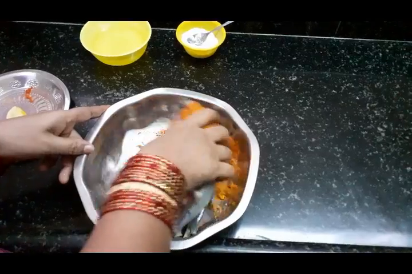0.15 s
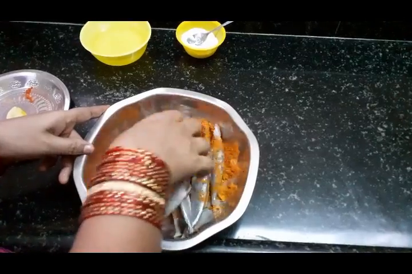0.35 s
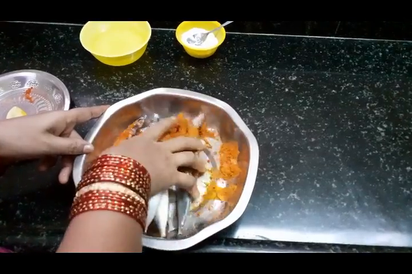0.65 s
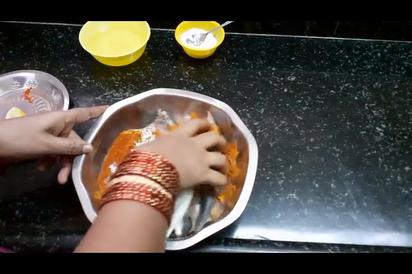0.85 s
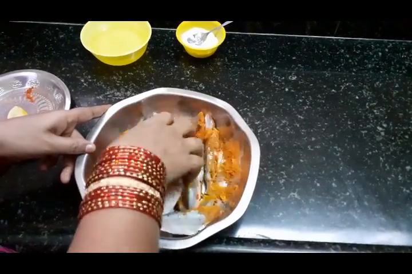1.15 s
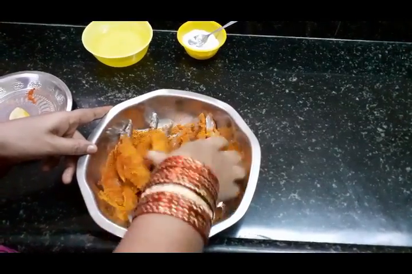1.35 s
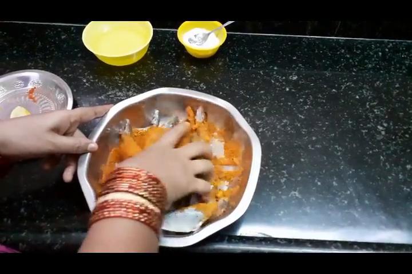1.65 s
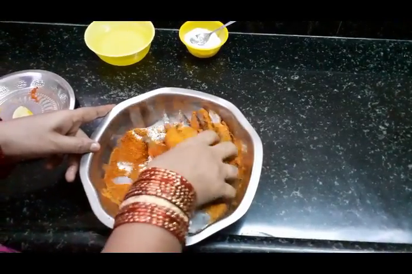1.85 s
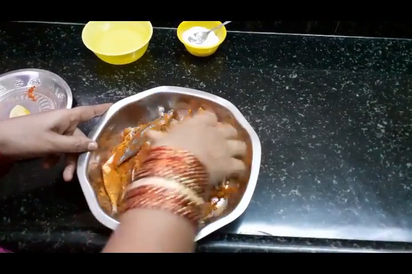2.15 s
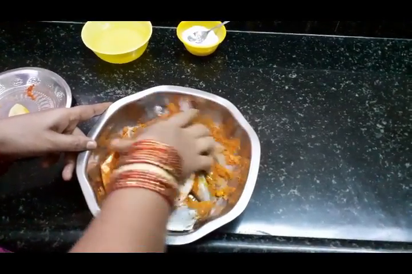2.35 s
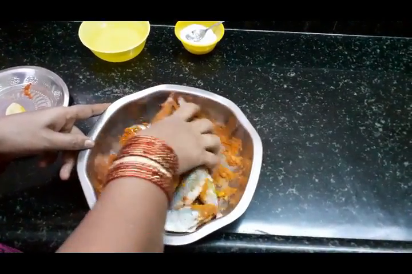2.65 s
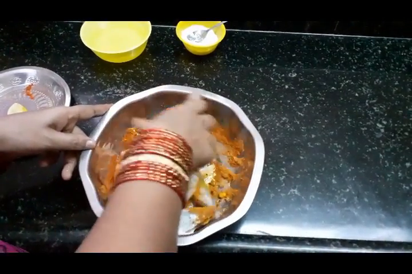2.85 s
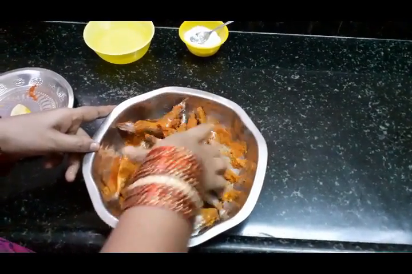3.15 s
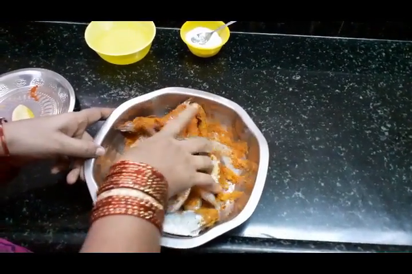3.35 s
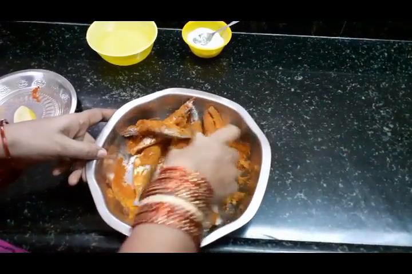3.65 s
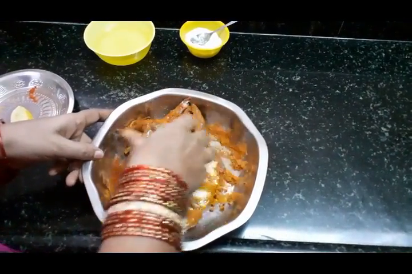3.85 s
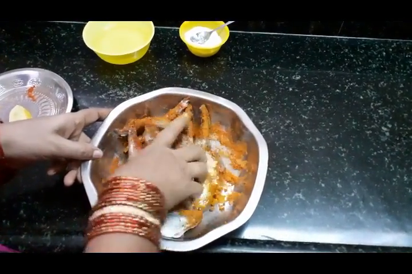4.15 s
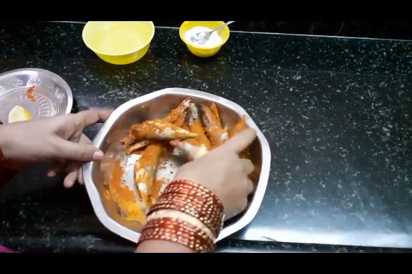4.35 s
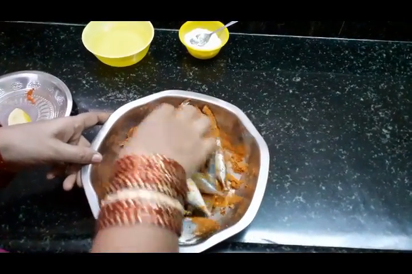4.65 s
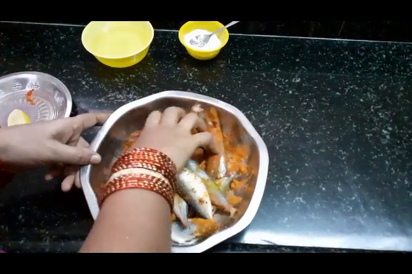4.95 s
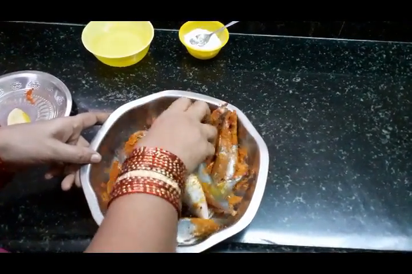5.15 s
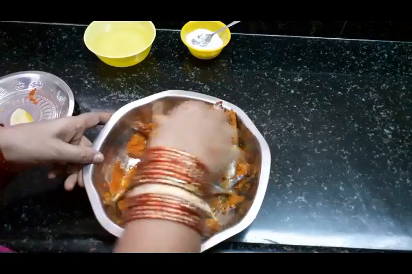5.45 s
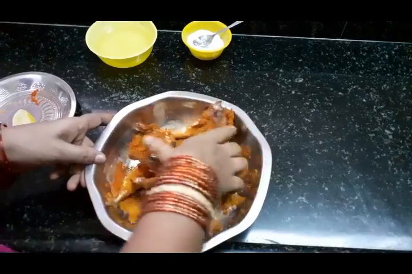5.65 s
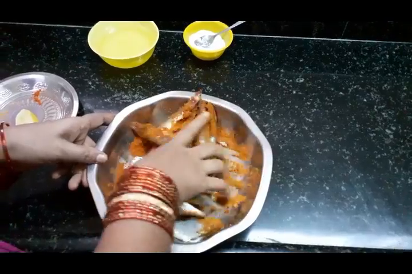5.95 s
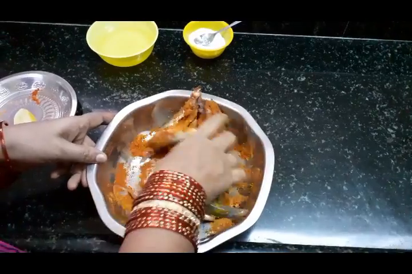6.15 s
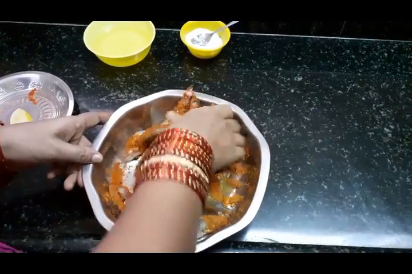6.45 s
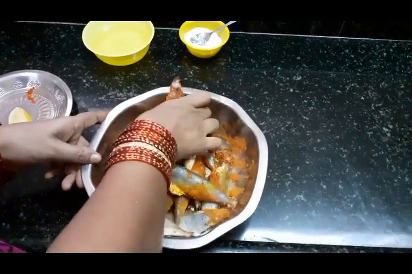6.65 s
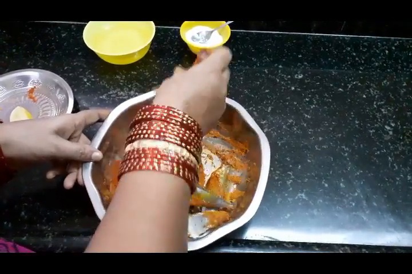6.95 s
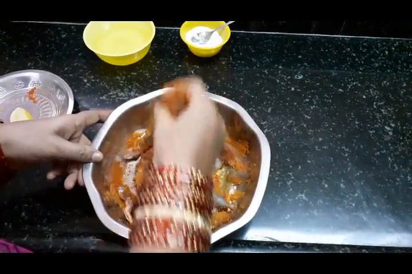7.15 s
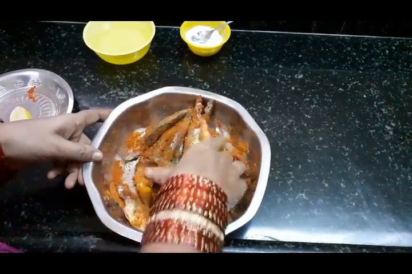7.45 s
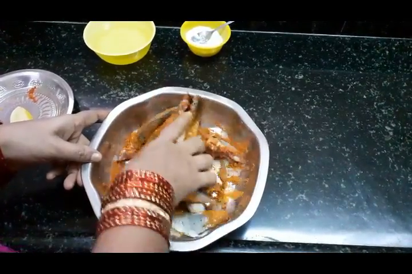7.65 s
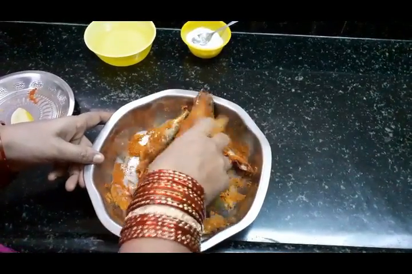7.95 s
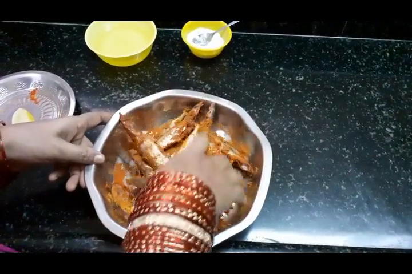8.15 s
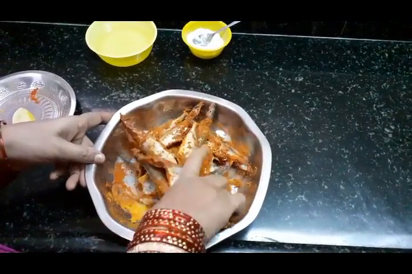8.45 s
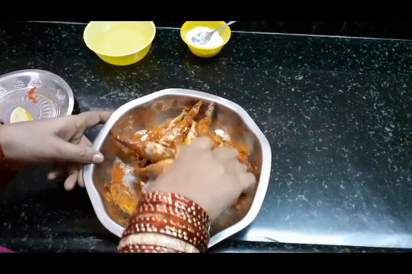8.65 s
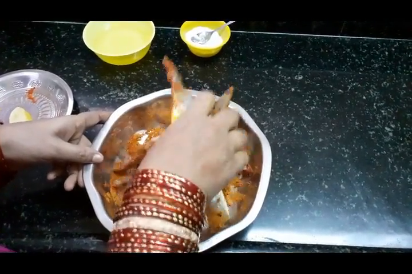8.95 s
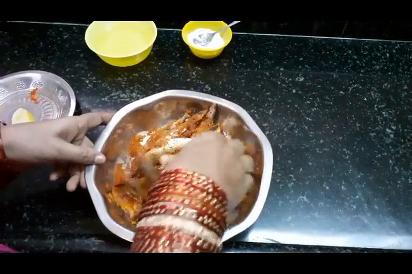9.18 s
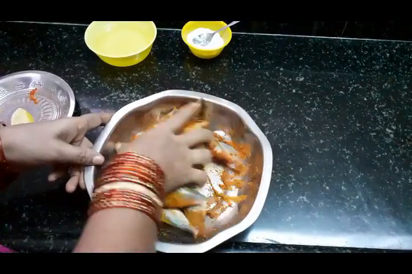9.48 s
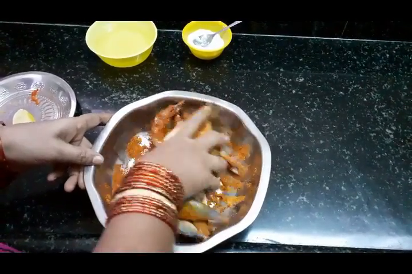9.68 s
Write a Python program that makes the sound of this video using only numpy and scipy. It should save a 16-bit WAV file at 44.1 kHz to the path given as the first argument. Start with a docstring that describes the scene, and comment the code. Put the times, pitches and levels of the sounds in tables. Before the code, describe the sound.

Small slick fish are kneaded by hand in a metal bowl on a stone counter, heard near the microphones in stereo with a short kitchen reverberation. Irregular moist rustles and sticky crackles start strongly, then soften into spaced squeezes. Dull steel knocks, bangle-like ticks and soft thuds scatter through, with one grinding, booming bowl slide midway and a sloppy slap and firm strokes near the end.

```python
"""Small wet fish with spice paste are tossed by hand in a steel bowl: skins rub, crackle and pop.
Uneven crackling noise makes the rubbing; short ringing tones and noise make the bowl's taps and knocks.
Soft thuds, bright ticks, wet noise bursts and one scuff of the bowl on a stone counter join in.
The bowl's modes hum softly over a faint drone. Hard kitchen walls answer all but thuds, hum and drone."""
import sys
import numpy as np
from scipy import signal
from scipy.fft import rfft, irfft, next_fast_len
from scipy.io import wavfile

SR = 44100
rng = np.random.default_rng(int(sys.argv[2]) if len(sys.argv) > 2 else 0)


def output_pcm(signal):
    """Save a mono or channel-first signal as 16-bit PCM at the path in sys.argv[1].

    Samples are clipped to [-1, 1] before scaling.
    """
    pcm = np.clip(np.atleast_2d(signal).T, -1, 1) * 32767
    wavfile.write(sys.argv[1], SR, np.round(pcm).astype(np.int16))


N = 432943

# The hand sweeps the fish round the bowl; each sweep swells, then stops.
# Each row: moment of the peak in seconds, level in dB, swell rate in dB per second.
SWEEPS = [(0.0, -45, 100), (0.598, -48, 52), (0.85, -40.5, 79), (1.756, -43.5, 68), (2.382, -38.5, 120),
          (2.6, -45, 65), (6.008, -40, 105), (7.659, -45.5, 61), (9.679, -44, 96)]
# The fingers close on the fish, knead and let go.
# Each row: start in seconds, level in dB, hold time in seconds.
SQUEEZES = [(0.07, -55.5, 0.17), (0.209, -44, 0.16), (0.833, -38.5, 0.024), (1.311, -50.5, 0.16),
            (1.923, -48, 0.26), (2.636, -51, 0.15), (3.151, -50, 0.35), (3.56, -52.5, 0.27),
            (4.084, -49, 0.26), (4.405, -52, 0.13), (4.784, -47.5, 0.27), (5.292, -48, 0.032),
            (5.492, -47, 0.26), (6.154, -49, 0.066), (6.359, -51.5, 0.46), (6.97, -51, 0.085),
            (7.843, -48.5, 0.22), (8.202, -46, 0.22), (8.752, -52.5, 0.3), (9.2, -49.5, 0.29)]
# Tone colour of the rubbing skins. Each row: frequency in Hz, level in dB per Hz.
SKIN_COLOUR = [(150, -33), (500, -28), (1060, -7.5), (1400, 2.5), (1900, -2.5), (4000, 2.5), (7000, -11)]
# Tone colour of the crackling paste. Each row: frequency in Hz, level in dB per Hz.
PASTE_COLOUR = [(4500, -20.5), (6300, 0), (7200, -6), (9000, 5), (10300, -12), (16000, -5.5)]
# Ringing modes of the steel bowl. Each row: frequency in Hz, level in dB with the hand in it,
# level in dB with the hand lifted, time in seconds to fall 60 dB when free.
BOWL_MODES = [(321.8, -7, -1.5, 0.4), (368.4, -6, -15, 0.49), (505, -9.5, -25, 0.24), (681, -6, -21, 0.15),
              (948, -9.5, -3, 0.3), (1083, -13, -7, 0.31), (1344, 1, -3, 0.097), (1419, 0, -2.5, 0.043),
              (1780, -3.5, -9, 0.052), (2025, -26, -2, 0.38), (2730, -16.5, -5.5, 0.18),
              (3918, -8.5, -16, 0.047)]
# The hand is out of the bowl. The row: from and to, both in seconds.
HAND_LIFTED = (6.9, 7.4)
# Tone colour of the faint drone. Each row: frequency in Hz, level in dB per Hz.
DRONE_COLOUR = [(30, -52), (105, -5.5), (140, -21.5), (350, -19.5), (600, -23), (3900, -23), (16000, -28.5)]
# Light taps that ring a few neighbouring modes. Each row: start in seconds, level in dB, centre in Hz.
TAPS = [(0.22, -48, 1440), (2.929, -63, 424), (3.029, -71.5, 347), (3.58, -64, 3000), (3.908, -65, 1320),
        (4.29, -63, 386), (4.54, -64, 696), (4.551, -72, 1280), (4.761, -69.5, 1340), (5.257, -64.5, 1260),
        (5.314, -62, 1300), (5.328, -57.5, 394), (5.744, -56, 740), (6.382, -63.5, 710),
        (6.459, -65.5, 630), (6.617, -67, 576), (8.022, -58.5, 680), (8.829, -60.5, 3960)]
# Tone colour of a contact's crack. Each row: frequency in Hz, level in dB per Hz.
CRACK_COLOUR = [(60, -16), (200, -11.5), (600, 1), (1350, -1), (2300, -9), (4000, -10), (6500, -16.5),
                (9000, -9.5), (10500, -18), (16000, -25)]
# The bowl knocks on the stone. Each row: start in seconds, level in dB before the tone is shaped,
# weight below 750 Hz in dB, edge above 2.2 kHz in dB, treble cut-off in Hz.
KNOCKS = [(0.234, -53, -14, -1.5, 14000), (0.303, -58.5, 4, -1, 14000), (1.046, -43.5, -0.5, 6.5, 3900),
          (1.111, -46, -8.5, -6.5, 15000), (1.951, -44.5, -5, -8.5, 7660), (2.01, -54.5, -1, -4.5, 9450),
          (2.071, -38, -9, -8, 15000), (2.615, -52.5, -0.5, -5.5, 4870), (2.767, -49.5, -9.5, -10.5, 3280),
          (3.699, -71.5, 3.5, 11, 5070), (4.403, -58.5, 2, -1, 5000), (4.803, -43, 7, 3, 4700),
          (4.941, -52.5, 4.5, -1, 2500), (6.009, -67.5, 12, 4, 5060), (7.138, -39.5, -6.5, 3.5, 2740),
          (7.683, -49, -12, 1, 7600), (7.701, -38.5, 0.5, -0.5, 6900), (8.048, -48, -6, -5.5, 9960),
          (8.201, -57.5, 3, -6, 3930), (8.857, -49.5, 1, -1.5, 6200), (9.067, -60, 2, -2, 3080),
          (9.196, -60, 5.5, 5.5, 9000), (9.661, -47, 4.5, -3, 5000)]
# Soft pushes boom through the counter. Each row: start in seconds, level in dB.
THUDS = [(0.344, -59), (2.079, -61), (3.15, -63), (4.791, -53), (5.333, -59.5), (6.819, -65.5),
         (8.871, -58), (9.077, -63.5), (9.669, -62)]
# Bright ticks from bangles, wet paste and hard contacts. Each row: start in seconds, level in dB.
BRIGHT_TICKS = [(1.111, -59.5), (2.072, -46), (3.038, -61), (3.911, -61), (4.482, -58.5), (4.696, -66),
                (6.253, -57.5), (7.151, -54.5), (7.779, -48.5), (8.413, -57)]
# Tone colour of a tick. Each row: frequency in Hz, level in dB per Hz.
TICK_COLOUR = [(1800, -42), (4200, 4), (6500, -3), (8700, 5.5), (10500, -2.5), (15000, -1.5)]
# Wet noise bursts: a bright rubbing swell, a soft low rub, a sprinkle and one sloppy slap.
# Each row: start in seconds, level in dB, length in seconds, lowest pitch in Hz.
WET_BURSTS = [(2.252, -53, 0.14, 7000), (4.174, -61.5, 0.12, 597), (7.234, -48, 0.053, 7550),
              (7.693, -34.5, 0.079, 201)]
# Tone colour of a wet burst. Each row: frequency in Hz, level in dB per Hz.
BURST_COLOUR = [(200, -4.5), (700, -2.5), (2000, -11.5), (4200, -7.5), (6500, -18), (15000, -20.5)]
# Tone colour of the sliding foot of the bowl. Each row: frequency in Hz, level in dB per Hz.
FOOT_COLOUR = [(80, -28), (170, -10), (250, -18.5), (325, 1.5), (410, -17.5), (540, -15), (800, -32),
               (2500, -53)]
# How long the kitchen rings. Each row: frequency in Hz, time in seconds to fall 60 dB.
ROOM_T60 = [(260, 0.45), (1840, 0.34), (5000, 0.24), (14000, 0.29)]
# Tone balance of the two microphone ports. Each row: frequency in Hz, left minus right in dB.
PORT_BALANCE = [(100, -6), (400, -4), (4400, -3), (8300, -6.5), (11500, -0.5)]

TOP_HZ = 16000  # nothing is kept above this
TIME = np.arange(N) / SR  # seconds through the scene
RING = TIME[:SR // 2]  # seconds through one short sound
SWEEP_STOP_DB_PER_S = 164.5
# a squeeze: attack, slow sag while held, extra fall on release
GRIP_S, RELAX_DB_PER_S, LET_GO_DB_PER_S = 0.0079, 3, 179


def undb(db):
    """Turn decibels into gain."""
    return 10 ** (np.asarray(db) / 20)


def unit(x):
    """Scale to an rms (average strength) of 1."""
    return x / np.sqrt(np.mean(x ** 2))


def blow(x):
    """Scale a short sound to the energy of one second at an rms of 1."""
    return unit(x) * np.sqrt(SR / x.shape[-1])


def freqs(size):
    """Give the frequencies in the spectrum of a sound of this size."""
    return np.maximum(np.fft.rfftfreq(size, 1 / SR), 1)


def lookup(points, hz):
    """Read between (Hz, value) points, spaced by pitch as the ear hears it."""
    f, value = np.transpose(points)
    return np.interp(np.log(hz), np.log(f), value)


def colour(x, points):
    """Filter to the given (Hz, dB) curve, with no sound before its cause (minimum phase)."""
    size = 2 * next_fast_len(x.shape[-1])
    cepstrum = irfft(np.log(undb(lookup(points, freqs(size)))))
    # fold the later half onto the first so that the filter never rings early
    cepstrum[1:size // 2] *= 2
    cepstrum[size // 2 + 1:] = 0
    response = np.exp(rfft(cepstrum))
    return irfft(rfft(x, size) * response)[..., :x.shape[-1]]


def cut(x, hz, kind, order=2):
    """Keep the sound below hz ("low") or above it ("high")."""
    return signal.sosfilt(signal.butter(order, min(hz, TOP_HZ), kind, fs=SR, output="sos"), x)


def diffuse(size, apart_hz):
    """Make noise at two microphone ports: alike in the bass, unrelated in the treble."""
    mid, side = rng.standard_normal((2, size))
    side = cut(side, apart_hz, "high", order=1)
    return np.array([mid + side, mid - side])


def add(out, s, x):
    """Mix a sound in at s seconds."""
    i = max(int(s * SR), 0)
    out[:, i:i + x.shape[-1]] += x[:, :N - i]


def wander(rate_hz):
    """Slide between random values, reaching a new one rate_hz times a second."""
    steps = rng.standard_normal(N // 100)
    return np.interp(TIME * rate_hz, np.arange(len(steps)), steps)


def effort():
    """Rubbing level in dB: sweeps swell and stop; squeezes start quickly, sag and let go."""
    power = 0
    for s, db, swell in SWEEPS:
        drop = np.maximum(swell * (s - TIME), SWEEP_STOP_DB_PER_S * (TIME - s))
        power = power + undb(db - drop) ** 2
    for s, db, hold in SQUEEZES:
        age = np.maximum(TIME - s, 0)
        fall = RELAX_DB_PER_S * age + LET_GO_DB_PER_S * np.maximum(age - hold, 0)
        attack = np.minimum(age / GRIP_S, 1)
        power = power + (attack * undb(db - fall)) ** 2
    return 10 * np.log10(power)


def crackle(rate, spread_db, hiss):
    """Tiny sticky films burst, rate times a second and some louder, over a smooth sliding hiss."""
    loudness = undb(spread_db * np.minimum(rng.exponential(size=N), 4))
    sizes = loudness * (rng.random(N) < rate / SR)
    bursts = unit(sizes * rng.standard_normal((2, N)))
    return unit(bursts + hiss * rng.standard_normal((2, N)))


def pops(count=3000, pitch_hz=2900, drift_octaves=0.56, drift_hz=14, scatter_octaves=1.74, cycles=2.6, size_db=5):
    """Air pockets between wet fish snap open as short fading tones around a drifting pitch."""
    out, t = np.zeros((2, N)), RING[:SR // 100]
    centre = pitch_hz * 2 ** (drift_octaves * wander(drift_hz))
    for when, pitch, size, lag in rng.random((count, 4)):
        hz = min(centre[int(when * N)] * 2 ** (scatter_octaves * (pitch - .5)), TOP_HZ)
        # the second port hears each snap at another point of its cycle
        phase = 2 * np.pi * hz * t + np.array([[0], [np.pi * (2 * lag - 1)]])
        snap = np.sin(phase) * np.exp(-hz * t / cycles) * np.sqrt(hz)
        # many small pockets, few big ones
        gain = undb(-size_db * np.log(size + 20 / count))
        add(out, when * N / SR, gain * snap)
    return unit(out)


def rubbing(uneven_db=1.0, grip_hz=24, skin_db=-3.5, paste_db=-7, pop_db=-5, firm_db=-53, skin_db_per_db=0.5, shift_db=3):
    """Fish slide over each other with an uneven grip; the paste crackles finely on top."""
    db = effort()
    press = np.maximum(db - firm_db, 0)
    skin = rfft(colour(crackle(rate=980, spread_db=1.5, hiss=1.0), SKIN_COLOUR))
    # the gaps under the hand keep shifting the colour: each half octave wanders on its own
    band = np.round(2 * np.log2(np.clip(freqs(N), 2 ** 10, 2 ** 13)))
    skin = unit(sum(irfft(skin * (band == k), N) * undb(shift_db * wander(grip_hz)) for k in np.unique(band)))
    # hard strokes bring out the skins
    skin = skin * undb(skin_db + skin_db_per_db * press)
    paste = unit(colour(crackle(rate=700, spread_db=8, hiss=0.96), PASTE_COLOUR))
    paste = undb(paste_db + 2 * wander(grip_hz)) * paste
    rub = undb(db + uneven_db * wander(grip_hz)) * (skin + paste + undb(pop_db) * pops())
    # wet skins cling and let go in spurts a few milliseconds long
    spurts = unit(undb(5 * np.minimum(wander(170), 1.8)))
    return spurts * rub


def bowl_hum(level_db=-67, db_per_db=-0.03, waver_db=4.5, waver_hz=7):
    """The bowl's two lowest modes hum: noise through sharp resonances, a touch softer in hard rubbing."""
    noise, db = diffuse(N, 730), effort()
    hum = sum(signal.lfilter(*signal.iirpeak(hz, 12, fs=SR), noise) for hz, *_ in BOWL_MODES[:2])
    return unit(hum) * undb(level_db + db_per_db * (db - np.median(db)) + waver_db * wander(waver_hz))


def drone(level_db=-60.5, waver_db=0.76, waver_hz=2.6):
    """A faint drone of coloured noise wavers in level and fills the pauses."""
    return undb(level_db + waver_db * wander(waver_hz)) * unit(colour(diffuse(N, 860), DRONE_COLOUR))


def steel(s, place_db=2, port_turn=1.0, hand_t60=0.33, load_detune=0.02):
    """The bowl rings after a contact at s seconds; the hand damps it and the shifting load detunes it."""
    hz, held_db, lifted_db, t60 = np.transpose(BOWL_MODES)[:, :, None]
    place, detune, left, right = rng.standard_normal((4, len(BOWL_MODES), 1))
    db = lifted_db
    if not HAND_LIFTED[0] < s < HAND_LIFTED[1]:
        db = held_db + place_db * place
        t60 = 1 / (1 / t60 + 1 / hand_t60)
        hz = hz * (1 + load_detune * detune)
    modes = undb(db) / np.sqrt(t60) * np.exp(RING * (2j * np.pi * hz - np.log(1000) / t60))
    # higher modes reach the two ports more out of step
    ports = np.exp(1j * port_turn * np.array([left, right]) * np.minimum(hz / 1000, 2))[:, :, 0]
    return blow((ports @ modes).imag)


def crack(crack_s=0.0038):
    """A contact makes a brief burst of fading noise."""
    return blow(colour(diffuse(len(RING), 3000) * np.exp(-RING / crack_s), CRACK_COLOUR))


def taps(crack_db=-2):
    """The bowl rocks lightly under the hand; each tap rings one region of its modes."""
    out = np.zeros((2, N))
    for s, db, hz in TAPS:
        hit = steel(s) + undb(crack_db) * crack()
        region = cut(cut(hit, hz, "low", order=3), hz, "high", order=3)
        add(out, s, undb(db) * blow(region))
    return out


def knocks(crack_db=1.0, tail_db=-1, tail_s=0.058, pulses_per_s=600):
    """Each contact cracks and rings the bowl, with a rough, uneven tail of fading noise."""
    out = np.zeros((2, N))
    for s, level_db, weight_db, edge_db, top_hz in KNOCKS:
        pulses = rng.random(len(RING)) < pulses_per_s / SR
        rough = diffuse(len(RING), 1030) * pulses * np.exp(-RING / tail_s)
        tail = blow(colour(rough, CRACK_COLOUR))
        hit = steel(s) + undb(crack_db) * crack() + undb(tail_db) * tail
        hit = colour(hit, [(750, weight_db), (1330, 0), (2200, edge_db)])
        add(out, s, undb(level_db) * cut(hit, top_hz, "low", order=3))
    return out


def thuds(boom_hz=107, swell_s=0.028, bump_db=-4):
    """A push gives a dull noise bump and a low tone, both swelling and then fading."""
    out = np.zeros((2, N))
    for s, db in THUDS:
        swell = RING * np.exp(-RING / swell_s)
        # each boom is slightly off the common pitch
        hz = boom_hz * (1 + 0.0058 * rng.standard_normal())
        boom = blow(np.sin(2 * np.pi * hz * RING) * swell)
        bump = blow(cut(rng.standard_normal(len(RING)) * swell, 300, "low"))
        add(out, s, undb(db) * (boom + undb(bump_db) * bump)[None])
    return out


def bright_ticks(tick_s=0.0046):
    """Bright ticks from bangles, wet paste and hard contacts: quickly fading noise."""
    out = np.zeros((2, N))
    for s, db in BRIGHT_TICKS:
        tick = diffuse(len(RING), 1800) * np.exp(-RING / tick_s)
        add(out, s, undb(db) * blow(colour(tick, TICK_COLOUR)))
    return out


def wet_bursts(rise_s=0.0082):
    """Wet noise bursts, from soft rub to sloppy slap: dense crackle that swells and dies away."""
    out, spray = np.zeros((2, N)), crackle(rate=4200, spread_db=2.5, hiss=0.17)
    for s, db, length, low_hz in WET_BURSTS:
        shape = np.exp(-(RING / length) ** 2) * (1 - np.exp(-RING / rise_s))
        burst = spray[:, int(s * SR):][:, :len(RING)] * shape
        add(out, s, undb(db) * blow(cut(colour(burst, BURST_COLOUR), low_hz, "high")))
    return out


def scuff(start_s=5.482, level_db=-29, push_s=0.062, fade_db_per_s=75, length_s=0.32, slip_hz=38, grip=0.22, wobble=0.03,
          grit_db=-33, grit_s=0.089, grit_rise_s=0.019):
    """One shove slides the bowl: its foot grinds, sticks and slips unevenly, and comes to rest."""
    phase = np.cumsum(slip_hz * np.exp(.35 * wander(55))) / SR
    # each slip is a noise burst that fades within a part of its cycle
    slips = unit(colour(diffuse(N, 1400) * np.exp(-(phase % 1) / grip), FOOT_COLOUR))
    # the changing load bends the pitch of the boom
    bent = np.cumsum(1 + wobble * wander(slip_hz))
    slips = np.array([np.interp(bent, np.arange(N), x) for x in slips])
    age = np.maximum(TIME - start_s, 0)
    ramps = np.clip(np.minimum(age, length_s - age) / push_s, 0, 1)
    sliding = ramps * undb(level_db - fade_db_per_s * (age - push_s))
    # only the start of the slide grinds
    grinding = undb(grit_db) * np.minimum(age / grit_rise_s, 1) * np.exp(-(age / grit_s) ** 2)
    grit = unit(cut(colour(diffuse(N, 1300), CRACK_COLOUR), 520, "low"))
    return slips * sliding + grinding * grit


def kitchen(x, wet_db=-1.0, build_s=0.0015):
    """Close hard walls answer almost at once with a dense tail, each octave fading at its own pace."""
    noise, hz, tail = rfft(diffuse(len(RING), 1100)), freqs(len(RING)), 0
    octave = np.round(np.log2(np.clip(hz, 2 ** 6, 2 ** 14)))
    for k in np.unique(octave):
        fade = np.exp(-np.log(1000) * RING / lookup(ROOM_T60, 2 ** k))
        tail = tail + irfft(noise * (octave == k), len(RING)) * fade
    tail = blow(tail * (1 - np.exp(-RING / build_s))) / np.sqrt(SR)
    return x + undb(wet_db) * signal.fftconvolve(x, tail, axes=1)[:, :N]


def scene():
    """The fish, bowl and ticks sound through the kitchen; hum, drone and thuds are added directly."""
    bowl = kitchen(rubbing() + taps() + knocks() + bright_ticks() + wet_bursts() + scuff())
    return bowl + bowl_hum() + drone() + thuds()


def record(dry):
    """The two ports differ in colour; deep bass is lost, peaks are rounded and the top is cut steeply."""
    # half of the difference goes to each port
    ports = np.array([colour(x, [(hz, sign * db / 2) for hz, db in PORT_BALANCE]) for x, sign in zip(dry, (1, -1))])
    ports = .8 * np.tanh(cut(ports, 80, "high", order=3) / .8)
    return signal.sosfilt(signal.ellip(10, .2, 80, TOP_HZ, fs=SR, output="sos"), ports)


dry = scene()
out = record(dry)
output_pcm(out)
```